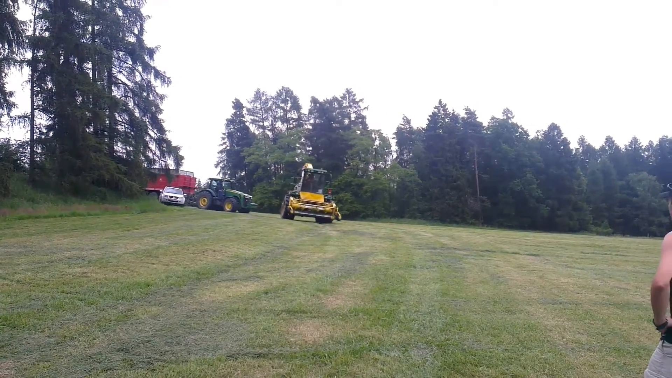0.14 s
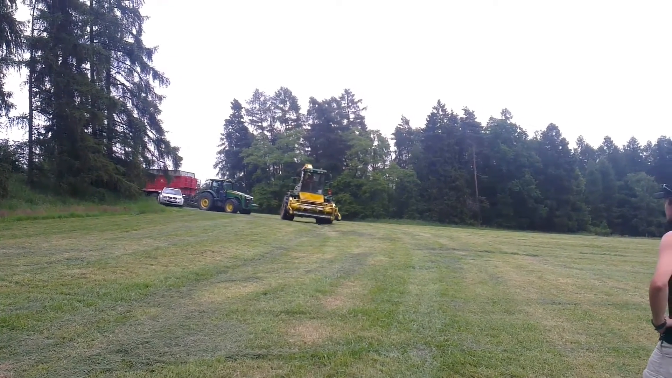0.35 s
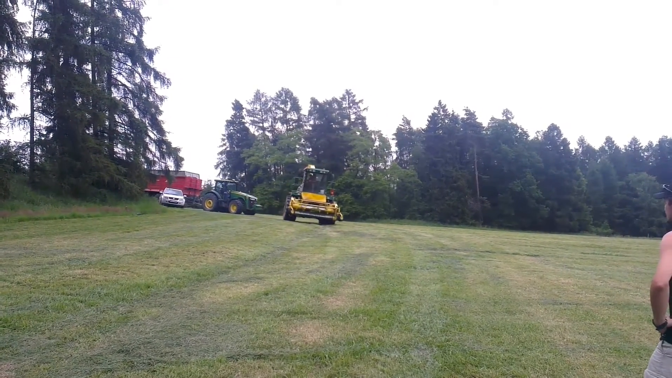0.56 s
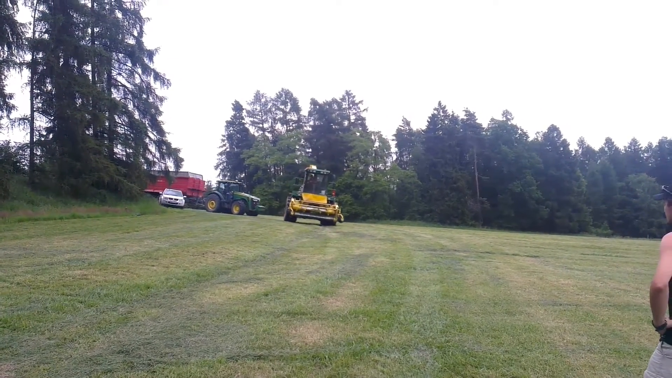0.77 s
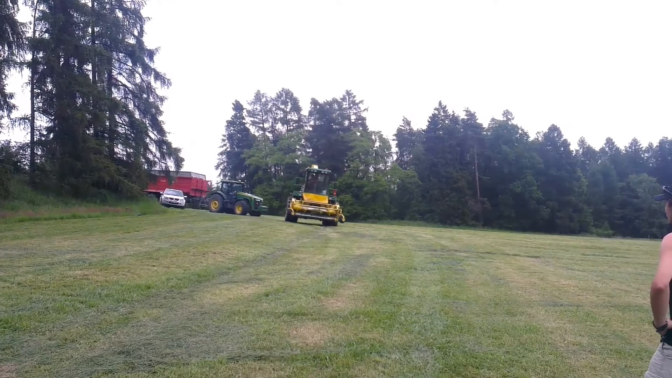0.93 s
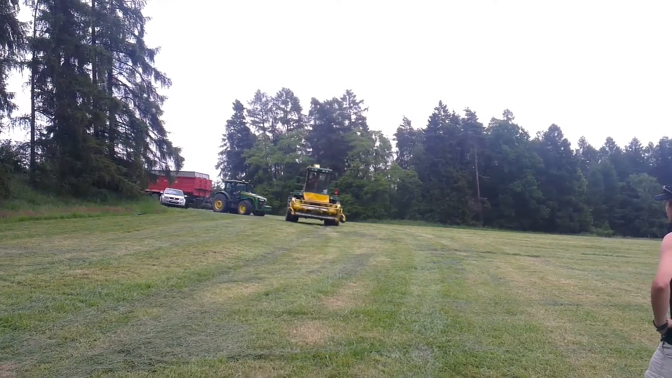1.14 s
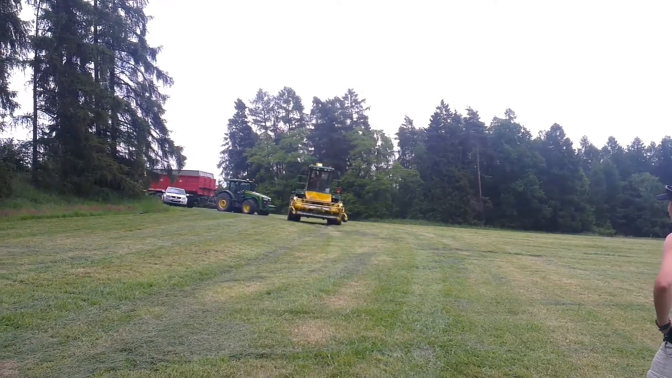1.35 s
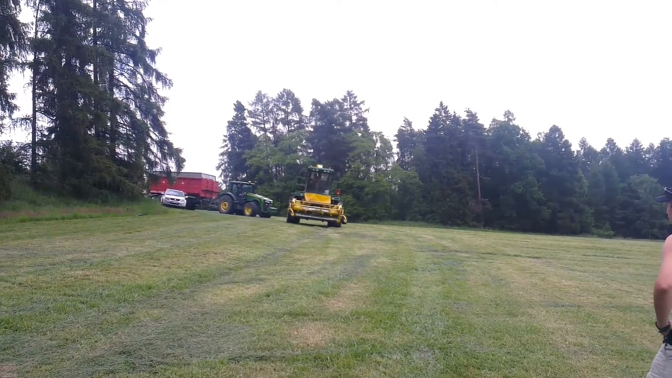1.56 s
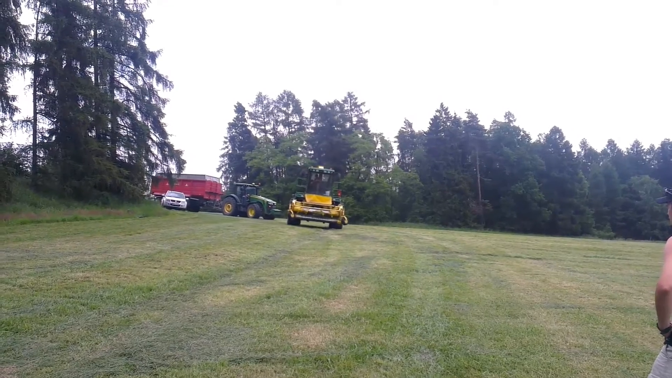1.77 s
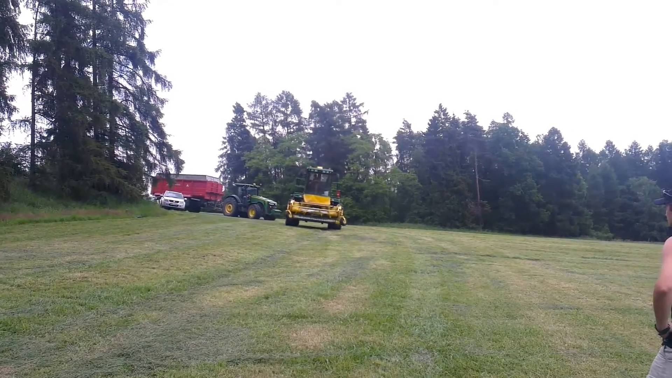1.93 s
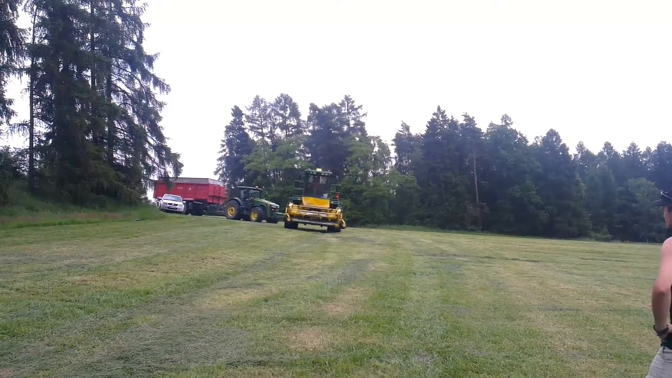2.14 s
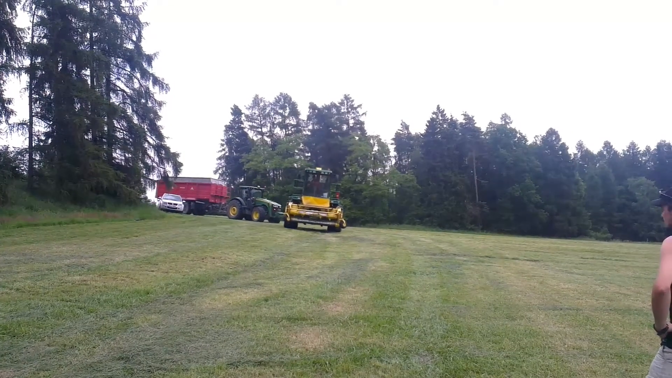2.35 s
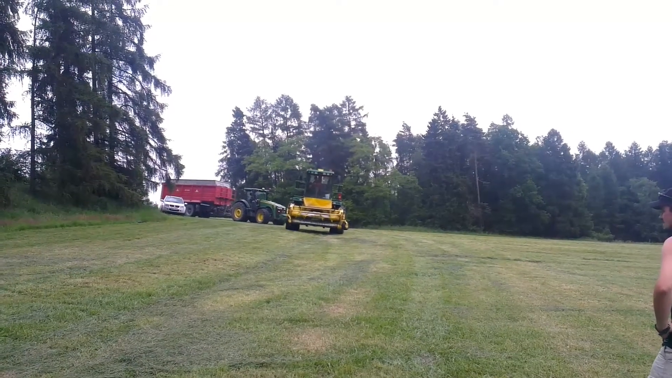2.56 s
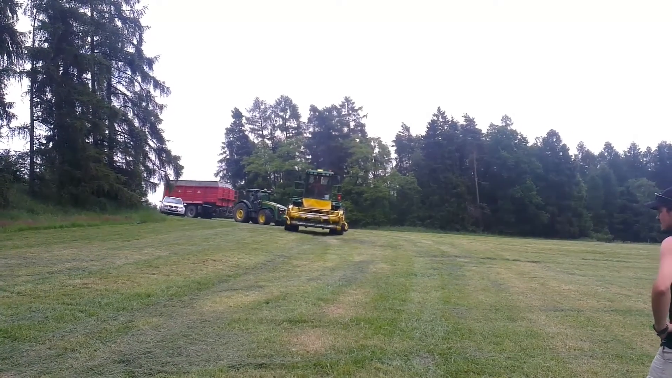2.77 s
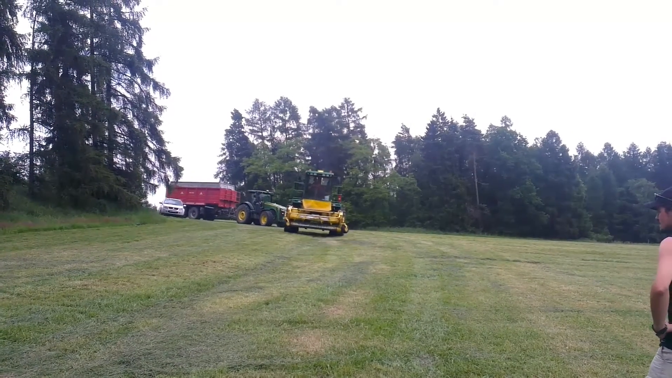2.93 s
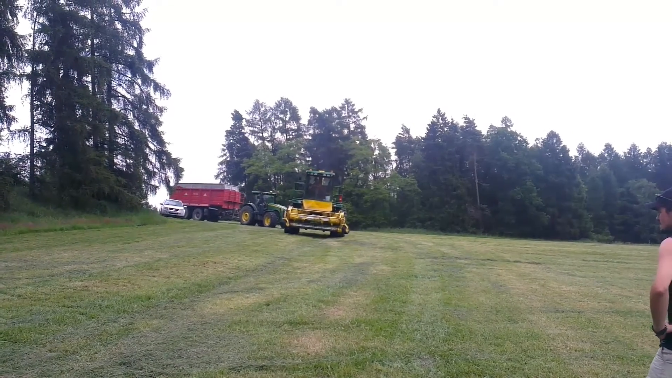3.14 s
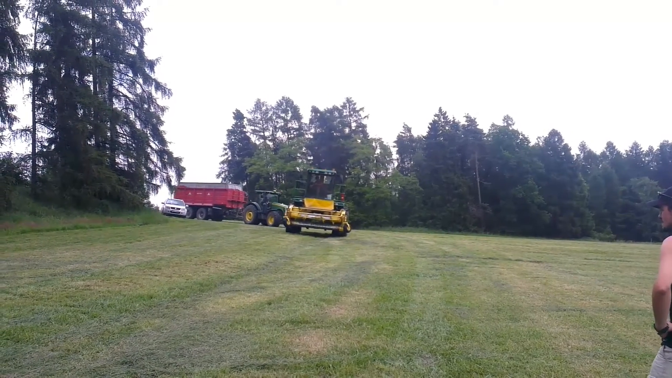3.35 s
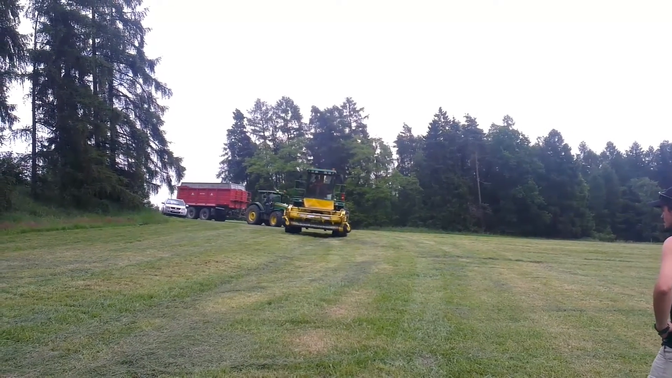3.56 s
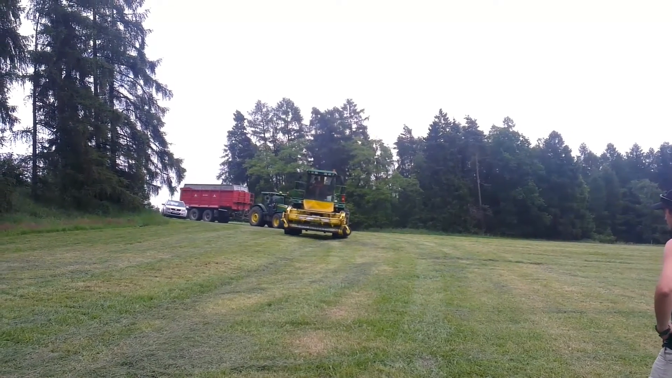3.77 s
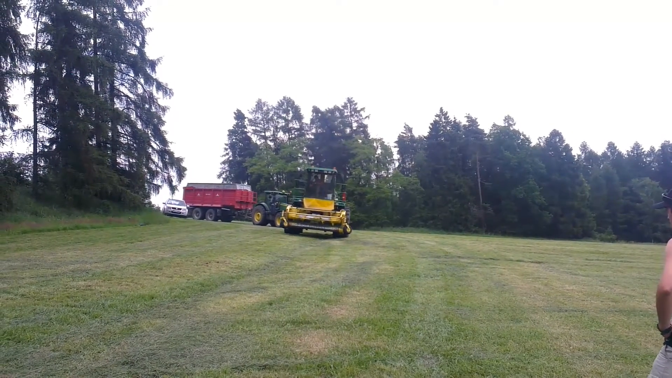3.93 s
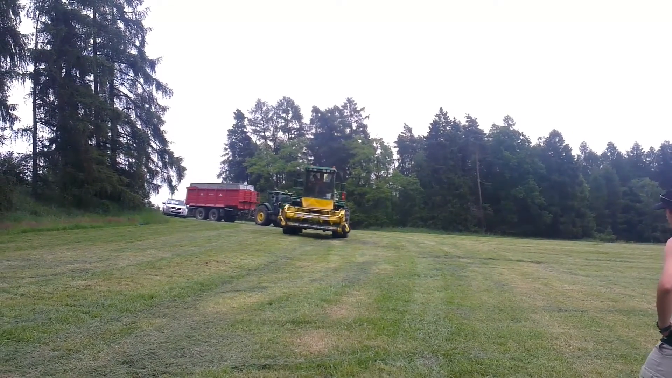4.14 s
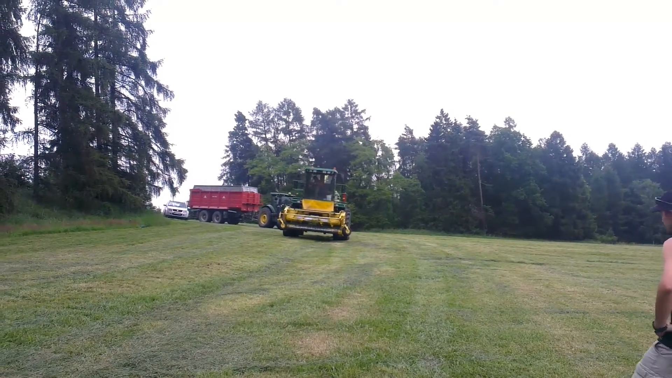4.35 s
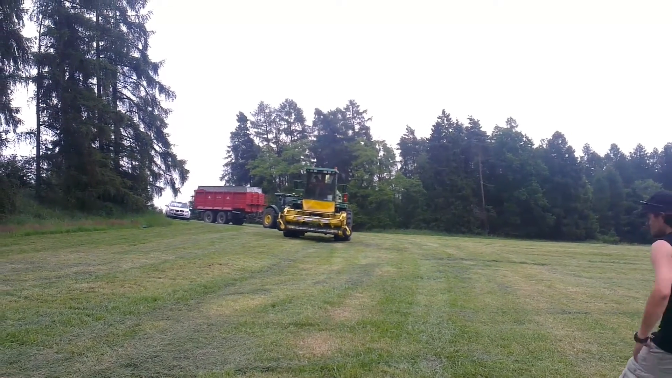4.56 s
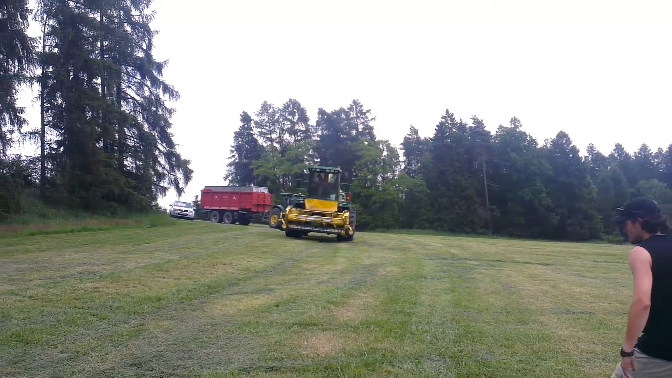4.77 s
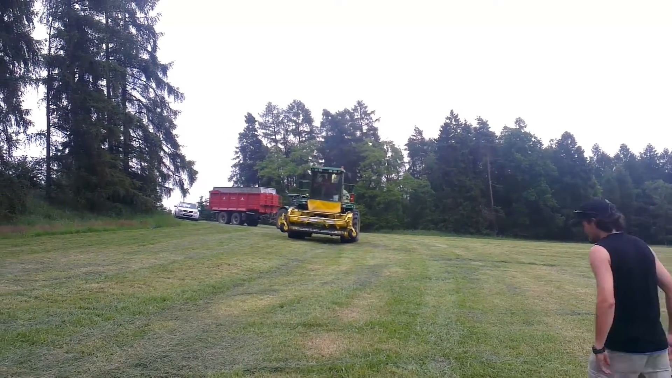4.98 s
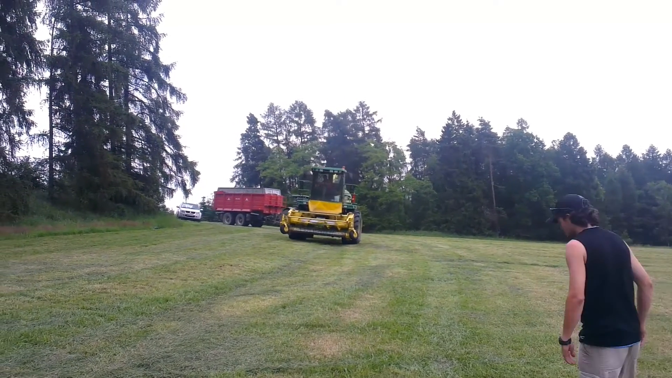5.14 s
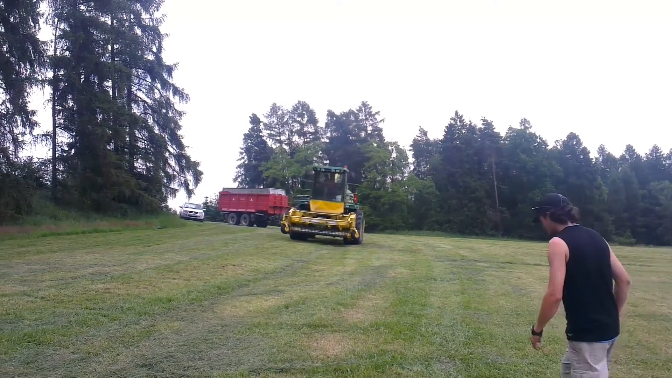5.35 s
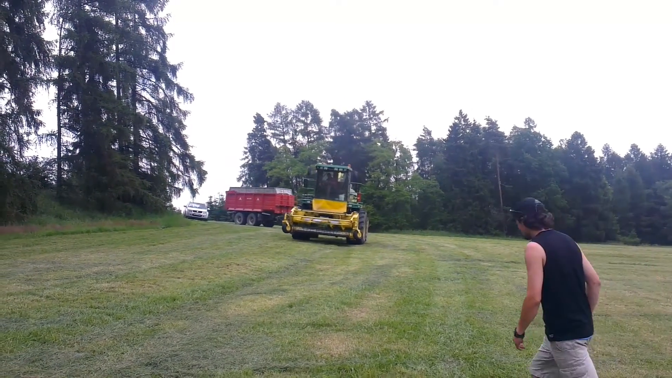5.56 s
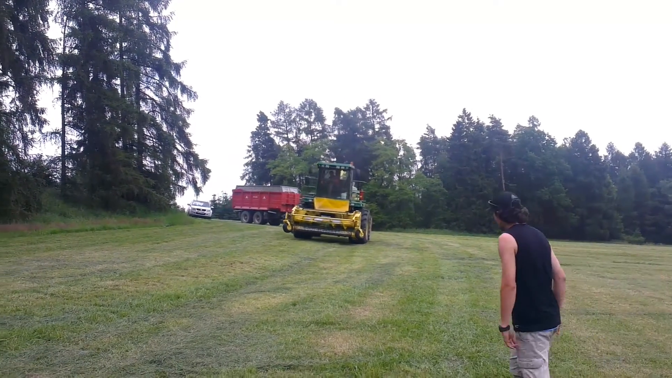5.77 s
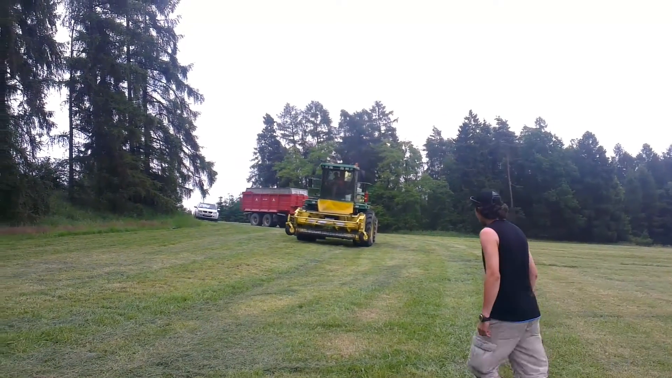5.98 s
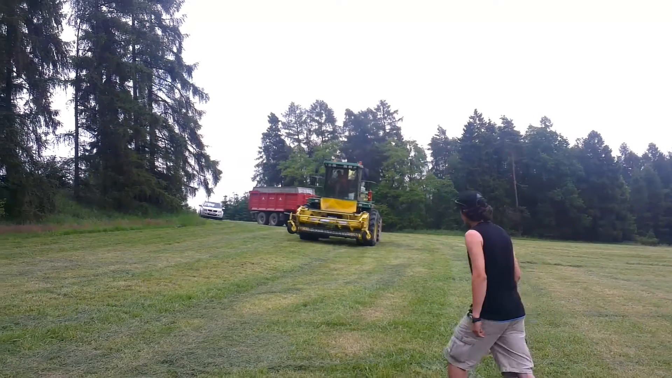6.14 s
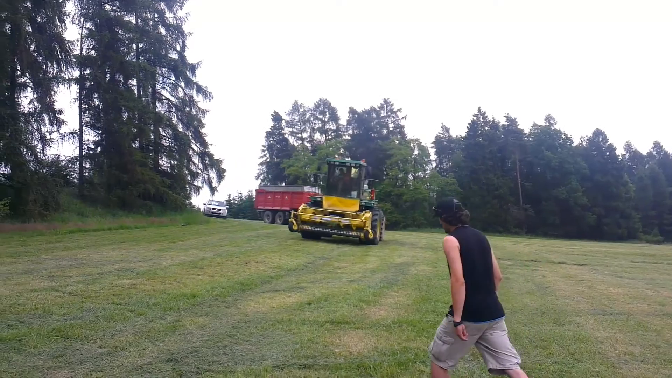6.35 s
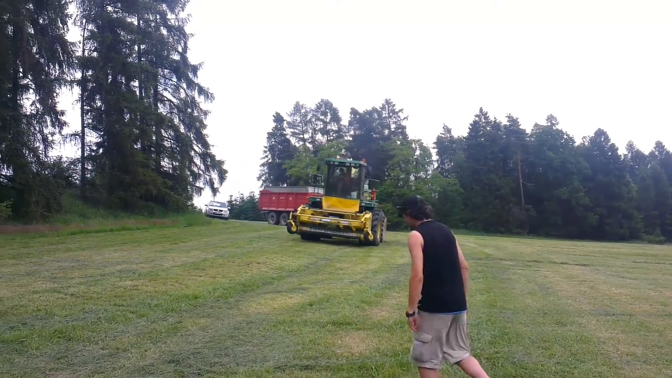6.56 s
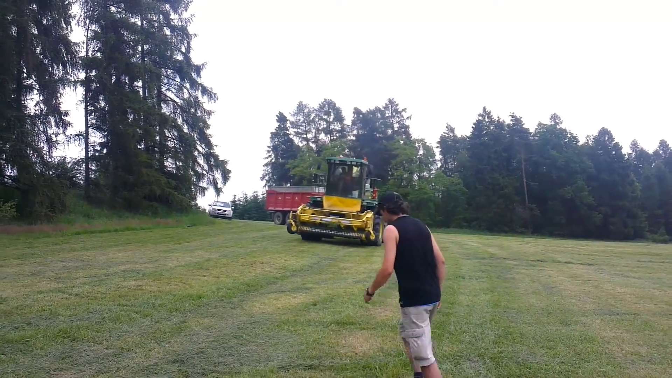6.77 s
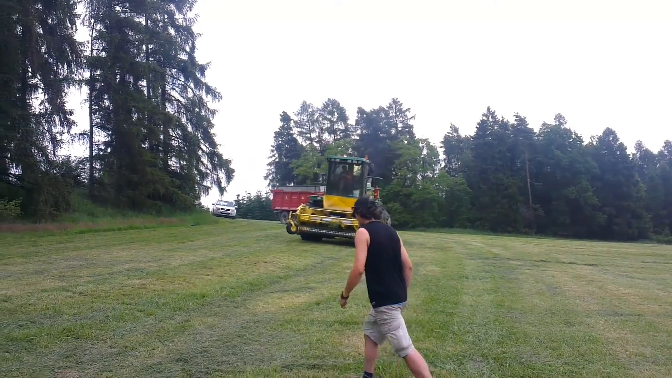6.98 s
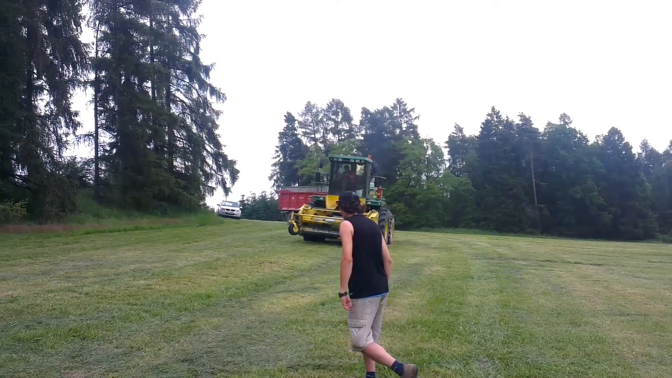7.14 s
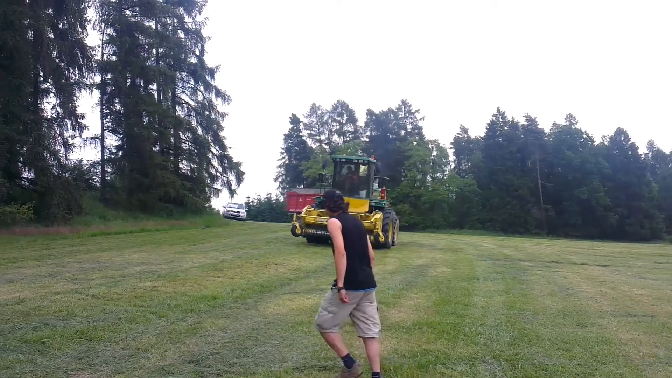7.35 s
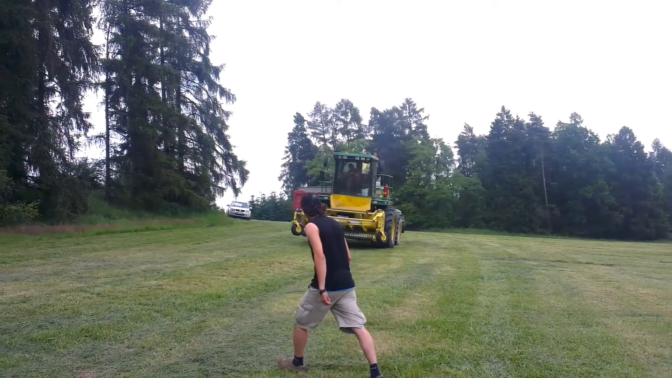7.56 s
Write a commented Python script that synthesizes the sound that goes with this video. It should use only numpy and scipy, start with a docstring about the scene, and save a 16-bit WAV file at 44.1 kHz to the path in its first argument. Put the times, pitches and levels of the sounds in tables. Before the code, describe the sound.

A self-propelled harvester approaches over an open mown field. Its chopping drum gives a dense, near-constant whine of many stacked tones, with pulsing air rush, hiss and a broad engine roar beneath. It stays moderate at first, grows clearly louder in the middle, then remains strong. Near the end the treble dips briefly as a man passes in front. Stereo outdoor microphone, little bass.

```python
"""Forage harvester approaching

A self-propelled forage harvester drives closer across a mown field edged with trees.
The chopping drum whines at harmonics of some 109 knife passes a second, over filtered noise pulsing with them.
Sines for diesel, fan and drives and a broad exhaust roar follow the drum's speed; a faint rumble lies below.
Near the end a man walks in front and briefly screens the treble."""
import sys
import numpy as np
from scipy import signal
from scipy.fft import rfft, irfft, next_fast_len
from scipy.io import wavfile
from scipy.ndimage import uniform_filter1d, map_coordinates

SR = 44100
rng = np.random.default_rng(int(sys.argv[2]) if len(sys.argv) > 2 else 0)


def generate_wav(signal):
    """Clip the signal to [-1, 1] and save it as 16-bit WAV at the path in sys.argv[1]."""
    frames = np.transpose(np.atleast_2d(signal))
    scaled = np.clip(frames, -1, 1) * 32767
    pcm = np.round(scaled).astype(np.int16)
    wavfile.write(sys.argv[1], SR, pcm)


N = 335601

# the approach: time_s, nearness (0 far, 1 near)
APPROACH = [(0, 0), (3.4, 0), (4.1, 0.34), (4.8, 0.7), (5.7, 1), (7.61, 1.09)]
# the governor hunts as the crop comes in unevenly: time_s, knife_rate_hz
SPEED = [(0, 108.66), (0.2, 108.62), (0.38, 108.45), (0.6, 108.68), (0.98, 108.38), (1.35, 108.73),
         (1.7, 108.5), (2.05, 108.57), (2.3, 108.35), (2.72, 108.64), (3, 108.38), (3.55, 108.8),
         (3.85, 108.29), (4.15, 108.71), (4.45, 108.57), (4.98, 108.86), (5.2, 108.54), (5.5, 108.67),
         (5.9, 108.66), (6.3, 108.82), (6.65, 108.61), (7.61, 108.7)]
KNIVES = 6  # knife passes in each turn of the drum
KNIFE_HZ = 108.6  # nominal knife passes a second

# drum harmonics, base levels: multiple_of_knife_rate, far_db, near_db, left_over_right_db, left_lead_rad
DRUM_TONES = [(5, -46.2, -32.8, 3, 0.2), (6, -46.9, -28.1, 2, 0.1), (7, -35.0, -28.6, 0, 0.0),
              (8, -44.2, -39.7, -3, 0.9), (9, -33.2, -28.3, 7, 0.8), (10, -31.7, -18.1, 6, 0.3),
              (11, -30.9, -21.3, 4, 0.1), (12, -49.1, -39.9, 1, 0.3), (13, -40.5, -29.5, 5, 0.9),
              (14, -43.8, -32.6, 13, 0.6), (15, -31.5, -35.8, 9, -0.2), (16, -43.2, -58.7, 1, -0.0),
              (17, -37.7, -33.1, 6, 0.8), (18, -39.7, -32.4, 13, 0.8), (19, -44.1, -44.2, 11, -2.3),
              (20, -39.1, -50.9, 3, -0.9), (21, -36.6, -32.4, 3, -0.0), (22, -39.0, -40.8, 4, 0.3),
              (23, -49.9, -38.3, 10, 0.7), (24, -46.4, -37.6, 7, -1.7), (25, -43.9, -44.2, 5, -1.1),
              (26, -46.7, -39.6, -2, 0.1), (27, -39.0, -41.5, 0, -1.0), (28, -38.9, -41.0, 1, -0.8),
              (29, -59.1, -35.6, 2, 1.1), (30, -39.7, -40.2, -4, -0.0), (31, -46.5, -41.0, -6, -0.9),
              (32, -48.3, -49.1, -13, -1.9), (33, -41.7, -51.8, -12, 2.5), (34, -48.1, -49.2, -2, 0.1),
              (35, -43.4, -47.2, -5, -0.6), (36, -52.9, -52.3, -12, 2.4), (37, -47.4, -55.8, -4, 1.8)]
# lobes and nulls of single harmonics sweep past as the machine turns:
# multiple_of_knife_rate, centre_s, half_width_s, gain_db
LOBES = [(5, 3, 1.5, 6), (6, 0.6, 1, 12), (6, 5.3, 0.9, -6), (7, 7.5, 0.45, 3.5), (8, 3.5, 1.3, 4),
         (9, 7, 0.57, 2.5), (10, 3.5, 0.61, -17.5), (10, 1.6, 0.24, 5), (10, 6.6, 0.19, -1.6),
         (11, 7.5, 1.27, -18.5), (11, 3.5, 1.3, -5.5), (12, 4.1, 0.6, 6.5), (13, 5.0, 0.98, 3.5),
         (13, 1.0, 0.65, 3.5), (14, 1.3, 0.55, -15), (14, 7.5, 0.59, -7.5), (15, 4, 0.55, -12),
         (15, 1.6, 0.3, 4.5), (16, 6, 1.26, 23.5), (17, 0.0, 0.4, -11), (17, 5.5, 0.23, -6),
         (18, 0.5, 1.3, -13), (19, 3, 1.3, -10.2), (20, 5, 1, 14.5), (21, 0.5, 0.65, -6),
         (22, 3.5, 1.4, -5.5), (22, 2, 0.3, -10), (23, 0.46, 0.55, 15), (24, 1.1, 1.3, 9.5),
         (27, 3, 0.77, -9), (27, 3.5, 0.82, 4.5), (28, 6.5, 1.6, 7.5), (28, 1.8, 0.9, 4),
         (29, 2.5, 1.1, 18), (30, 7, 0.53, 12.5), (30, 1, 0.36, -10), (31, 0.0, 0.27, 15),
         (32, 2.1, 1.2, 10), (33, 0, 0.98, -18), (34, 1.1, 1.4, -14), (35, 2.9, 1.3, -17),
         (36, 4, 0.45, 13), (37, 0, 0.71, -14.5), (37, 6.5, 1.3, 17.5)]
# echoes in the housing smear each knife's pulse: frequency_hz, phase_spread_cycles
SMEAR = [(550, .2), (870, .16), (970, .03), (1300, .035), (1500, .1), (2400, .12), (2800, .05), (3900, .08)]
SWEEP = .012  # each pulse is a short rising chirp: harmonic lag in cycles, per squared multiple
# unequal knives put tones between the harmonics, base levels: multiple_of_turning_rate, far_db, near_db
SIDE_TONES = [(34, -47, -41), (41, -53, -42), (44, -52, -43), (56, -52, -42), (59, -53, -38),
              (73, -59, -44), (77, -53, -45), (79, -52, -45), (89, -47, -47), (91, -49, -47),
              (119, -52, -52), (125, -52, -46), (127, -48, -47), (167, -49, -46), (169, -50, -47),
              (179, -54, -46), (181, -52, -45)]

# noise colours, overall level set elsewhere: frequency_hz, relative_level_db (per Hz)
AIR_FAR_COLOUR = [(400, -52), (850, -8), (1100, 6), (1350, -0.5), (1700, -0.5), (2050, 1), (2400, 0.5),
                  (3100, 2.5), (3700, -2.5), (4300, -30), (7000, -36)]
AIR_NEAR_COLOUR = [(400, -53.5), (850, -5.5), (1100, 9.5), (1350, 0), (1700, 2), (2050, 1), (2400, 2.5),
                   (3200, -2), (3700, -4), (4300, -15), (7000, -63)]
HISS_COLOUR = [(1500, -37), (3900, 6.5), (4300, 1.5), (4600, 6), (5500, 0.5), (7000, -1.5), (7800, -7.5),
               (8300, -6), (8800, -14), (9600, -5), (10100, -11.5), (10800, -41)]
ROAR_COLOUR = [(25, -68), (45, -63.5), (72, -46), (100, -49), (150, -46), (200, -21.5), (280, -18),
               (370, -22), (480, -14.5), (560, -4.5), (700, 0.5), (880, -6), (1200, -6.5), (2500, -65)]
RUMBLE_COLOUR = [(30, -30), (70, -18.5), (95, -30), (145, 0), (180, 3.5), (260, -23), (500, -71.5)]
# hollows in the rush, which shift as the machine nears: centre_hz, width_hz, far_depth_db, near_depth_db
HOLLOWS = [(1343, 34, 3.5, 0.5), (1800, 23, 4, 4), (2070, 50, 9, 8.5), (2675, 26, 3, 4), (2750, 28, 6, 8.5),
           (2880, 26, 4, 0), (3140, 47, 11, -0.5), (3590, 55, 7.5, 8), (3770, 32, 5.5, 7),
           (4284, 104, 15, 13), (4730, 66, 24, 20), (5160, 97, 6, 10.5), (5910, 58, 13, 8),
           (6360, 86, 15, 6.5)]
# passing nulls in rush and roar, as the machine turns: centre_hz, width_hz, centre_s, half_width_s, depth_db
NULLS = [(375, 30, 1.4, 0.49, 6), (1306, 60, 2, 0.88, 6), (1810, 35, -2, .5, 7), (1710, 50, 4.5, 0.32, 9),
         (1750, 55, 7.5, .55, 8), (2160, 50, 8, .8, 11), (2080, 45, 3.5, .9, 5), (2420, 45, 4.5, 0.76, 6),
         (3160, 55, -1, .6, 5), (3230, 45, 0, .5, 8), (3250, 55, 3, .45, 3), (3690, 60, -0.5, 0.95, 4),
         (3530, 40, 6.9, 1, 4), (4140, 88, .8, .7, 10), (4140, 70, 3.5, .6, 8), (4300, 70, 5, .55, 9)]
# diesel, fan and drive tones at nominal speed, base levels: pitch_hz, far_db, near_db
DRIVE_TONES = [(202.3, -63, -60), (226.5, -47.7, -44), (290.9, -58, -54), (436.9, -52.5, -47),
               (582, -44.5, -41), (679.7, -45, -34), (727.8, -39, -31), (795.5, -50, -43),
               (906.4, -55, -45), (1163.6, -43, -45), (1454.5, -50, -46)]
# brief lifts and dips of the level: centre_s, half_width_s, gain_db
SURGES = [(.33, 0.046, -1.5), (1.27, .07, 1.2), (2.59, .05, 1.7), (2.98, 0.037, -1.3), (3.39, 0.035, -0.5),
          (5.87, 0.095, 1), (6.38, 0.039, -2), (7.15, 0.065, 1)]
# likeness of left and right noise, before ripple and limits: frequency_hz, likeness (1 mono, 0 unrelated)
LIKENESS = [(70, 1.3), (200, .93), (700, 0.9), (1300, 0.5), (2400, 0.5), (3500, 0.3), (5500, 0.2),
            (8000, 0.5), (10000, 0)]
# left-right balance of the noise: frequency_hz, left_over_right_db
BALANCE = [(200, -3), (700, 2.5), (1100, 5), (2000, 4.5), (2800, 3.5), (3500, -4.5), (4800, -4), (6000, 1),
           (8000, -4), (10000, 14)]

# base levels far off, and the gain at nearness 1
AIR_DB, AIR_NEAR_DB = -28.5, 3
HISS_DB, HISS_NEAR_DB = -39.5, 3.5
ROAR_DB, ROAR_NEAR_DB = -33, 6
RUMBLE_DB, RUMBLE_NEAR_DB = -64.5, 2
ROAR_SWELL_S, ROAR_DB_PER_S = 6.45, 3.5  # the roar gains an extra swell from this time on
OPEN_S, OPEN_DB = 0.68, 2.5  # whine and roar start this much softer and open up over this time
SHADOW_S, SHADOW_HALF_S, SHADOW_DB = 7.05, 0.46, 4.5  # a man walks past and screens the treble
SHADOW_HZ = 3460  # drum tones lose less the further they lie below this
FLARE_S, FLARE_HALF_S, FLARE_DB = 6.65, 0.18, 3  # rush and hiss lift just before the screening
RATTLE_SHARE = .17  # share of the rush's excitation power that repeats every turn
TICK_GAIN, TICK_SHARPNESS = .45, 25  # knife passing the shear bar: relative height and narrowness
HOUSING_LOW_HZ = 520  # the housing radiates little below this
CROSS_DELAY_S = .001282  # the stereo likeness ripples like a mix with a copy this late
CEILING, TOP_HZ = .98, 10788  # soft limit of the peaks, and upper band limit


def amp(db):
    """Gain from decibels."""
    return 10 ** (np.asarray(db) / 20)


def unit(x):
    """Scale to an rms of 1."""
    return x / np.sqrt(np.mean(x ** 2) + 1e-20)


def along(points, hz):
    """Read a curve of frequency and value on a log frequency axis."""
    f, v = np.transpose(points)
    return np.interp(np.log(hz + 1), np.log(f + 1), v)


def time_curve(points):
    """Draw straight lines between time and value points, one value per sample."""
    s, values = np.transpose(points)
    return np.interp(np.arange(N) / SR, s, values)


def bump(centre_s, half_width_s):
    """A bell in time with a peak of 1."""
    return np.exp(-((np.arange(N) / SR - centre_s) / half_width_s) ** 2)


def wobble(rate):
    """A smooth random curve with this many knots a second."""
    coarse = np.linspace(0, N, 2000)
    knots = rng.standard_normal(1000)
    smooth = map_coordinates(knots, [coarse * rate / SR], mode="mirror")
    return np.interp(np.arange(N), coarse, smooth)


def filtered(x, response):
    """Shape the spectrum of x by a function of frequency."""
    m = next_fast_len(N + SR // 2)
    return irfft(rfft(x, m) * response(np.fft.rfftfreq(m, 1 / SR)), m)[..., :N]


def pan(db):
    """Left and right gains of constant power."""
    pair = amp(np.array([db, -db]) / 2).reshape(2, -1)
    return pair / np.sqrt(np.mean(pair ** 2, axis=0))


def tone(cycles, lead=0):
    """A stereo sine of rms 1 whose left side leads by an angle in radians."""
    angle = 2 * np.pi * (cycles % 1) + np.array([[lead], [-lead]]) / 2
    return np.sqrt(2) * np.sin(angle.astype(np.float32))


def noise(colour, white, lead_s=.00004):
    """Coloured stereo noise of rms 1, near mono in the bass and wide in the treble; it reaches the left first."""
    def mid_side(hz):
        likeness = along(LIKENESS, hz)
        ripple = 0.19 * (1 - likeness) * np.cos(2 * np.pi * hz * CROSS_DELAY_S)
        turn = np.arccos(np.clip(likeness + ripple, -1, 1)) / 2
        return amp(along(colour, hz)) * [np.cos(turn), np.sin(turn)]

    def placement(hz):
        lead = hz * lead_s / (1 + (hz / 2500) ** 2)  # the lead fades in the treble
        return pan(along(BALANCE, hz)) * np.exp(1j * np.pi * np.outer([1, -1], lead))

    mid, side = filtered(white, mid_side)
    return unit(filtered(np.array([mid + side, mid - side]), placement))


def opening():
    """The slight rise at the start, in dB."""
    return OPEN_DB * np.minimum(np.arange(N) / SR / OPEN_S - 1, 0)


def whine(passes, near, fade_db, drum_db, scatter):
    """Harmonics of the knife rate form one pulse a knife; moving air makes each waver, the high ones most."""
    out = np.zeros((2, N))
    common_db = drum_db + opening() + 0.52 * wobble(14)
    shadow_db = SHADOW_DB * bump(SHADOW_S, SHADOW_HALF_S)
    for order, far_db, near_db, side_db, lead in DRUM_TONES:
        level_db = far_db + (near_db - far_db) * near + common_db
        level_db = level_db - shadow_db * min(order * KNIFE_HZ / SHADOW_HZ, 1) ** 2
        level_db = level_db + sum(db * bump(s, half) for k, s, half, db in LOBES if round(k) == order)
        level_db = level_db + fade_db * np.sqrt(order / 20) * wobble(13)
        smear = along(SMEAR, order * KNIFE_HZ) * rng.standard_normal()
        wander = scatter * np.sqrt(order) * wobble(9.1)
        cycles = order * passes - SWEEP * order ** 2 + smear + wander
        out += amp(level_db) * pan(side_db) * tone(cycles, lead)
    return out


def side_tones(passes, near, fade_db):
    """Unequal knives sound multiples of the drum's turning rate, so the whine throbs evenly."""
    out = np.zeros((2, N))
    for order, far_db, near_db in SIDE_TONES:
        level_db = far_db + (near_db - far_db) * near + opening() + fade_db * wobble(3.19)
        out += amp(level_db) * pan(3.6) * tone(order * passes / KNIVES + rng.random(), 0.33)
    return out


def air(passes, near, puff_db, flutter_db):
    """Each knife throws a puff of air and ticks; the rush changes colour as the machine nears."""
    screen_db = FLARE_DB * bump(FLARE_S, FLARE_HALF_S) - SHADOW_DB * bump(SHADOW_S, SHADOW_HALF_S)
    air_db = AIR_DB + AIR_NEAR_DB * near + screen_db + flutter_db * wobble(14)
    hiss_db = HISS_DB + HISS_NEAR_DB * near + screen_db + 0.52 * wobble(16)
    stroke = np.cos(2 * np.pi * passes)
    puffs = unit(amp(puff_db * stroke))
    ticks = unit(1 + TICK_GAIN * np.exp(TICK_SHARPNESS * (stroke - 1)))
    share = np.clip(near, 0, 1)
    far_rush = flicker(noise(AIR_FAR_COLOUR, clatter(passes, RATTLE_SHARE)), depth_db=0.95, full_hz=1200)
    near_rush = flicker(noise(AIR_NEAR_COLOUR, clatter(passes, RATTLE_SHARE)), depth_db=0.9, full_hz=1200)
    rush = np.sqrt(1 - share) * amp(1.5) * far_rush + np.sqrt(share) * amp(3.0) * near_rush
    hiss = amp(2.5) * flicker(noise(HISS_COLOUR, clatter(passes, RATTLE_SHARE)), depth_db=4.5, full_hz=8000)
    hiss += amp(-1) * buzz(passes, fade_db=2.5, blur=0.19)
    return housing(ticks * (amp(air_db) * rush * puffs + amp(hiss_db) * hiss), share)


def buzz(passes, fade_db, blur):
    """The drum's highest harmonics, blurred in phase, sink into the hiss."""
    out = np.zeros((2, N))
    for order in range(38, 66):
        level_db = fade_db * wobble(7) - 0.29 * order
        cycles = order * passes + rng.random() + blur * wobble(25)
        out += amp(level_db) * tone(cycles, rng.normal(0, 1.57))
    return unit(out)


def clatter(passes, repeat):
    """White excitation of which a share repeats with every turn of the drum: each knife has its own rattle."""
    size = 16384  # points in one turn
    order = np.arange(size // 2 + 1)
    # what all knives have in common sounds in the whine instead
    heard = (order % KNIVES > 0) & (order * KNIFE_HZ / KNIVES < SR / 2)
    rattles = unit(irfft(heard * np.exp(2j * np.pi * rng.random((2, len(order))))))
    position = passes / KNIVES % 1 * size
    turn = np.array([np.interp(position, np.arange(size), row) for row in rattles])
    return np.sqrt(repeat) * turn + np.sqrt(1 - repeat) * rng.standard_normal((2, N))


def flicker(x, depth_db, full_hz):
    """Narrow bands flicker independently, with the whole depth from full_hz upward."""
    hz, _, z = signal.stft(x, SR, nperseg=512)
    field = uniform_filter1d(rng.standard_normal(z.shape[1:]), size=4, axis=0)  # across frequency
    field = unit(uniform_filter1d(field, size=18, axis=1))  # across time
    reach = np.minimum(hz[:, None] / full_hz, 1) ** 2
    return unit(signal.istft(z * amp(depth_db * reach * field), SR, nperseg=512)[1][:, :N])


def housing(x, share):
    """Hollows colour the air that rushes out, differently far off and near; the bass stays inside."""
    def response(hz):
        depth_db = sum(np.outer([far_db, near_db], np.exp(-((hz - c) / w) ** 2))
                       for c, w, far_db, near_db in HOLLOWS)
        low_cut = hz ** 6 / (hz ** 6 + HOUSING_LOW_HZ ** 6)
        return amp(-depth_db)[:, None] * low_cut

    far, close = filtered(x, response)
    return (1 - share) * far + share * close


def engine(passes, near, fade_db, drift):
    """Diesel, fan and drives turn in step with the drum, over a broad exhaust roar."""
    swell_db = ROAR_DB_PER_S * np.maximum(np.arange(N) / SR - ROAR_SWELL_S, 0)
    roar_db = ROAR_DB + ROAR_NEAR_DB * near + swell_db + opening() - 1.0 + 2.0 * wobble(12)
    out = amp(roar_db) * noise(ROAR_COLOUR, clatter(passes, repeat=0.039))
    clock = passes / KNIFE_HZ  # seconds at nominal speed
    for hz, far_db, near_db in DRIVE_TONES:
        level_db = far_db + (near_db - far_db) * near - .5
        level_db = level_db + fade_db * np.sqrt(500 / hz) * wobble(11)
        cycles = hz * clock + rng.random() + drift * wobble(3.02)
        out += amp(level_db) * pan(0.57) * tone(cycles, lead=0.083)
    return out


def passing_nulls(x):
    """Narrow bands sink for a moment and come back as the machine turns."""
    hz, t, z = signal.stft(x, SR, nperseg=2048)
    cut_db = sum(db * np.outer(np.exp(-((hz - c) / w) ** 2), np.exp(-((t - s) / half) ** 2))
                 for c, w, s, half, db in NULLS)
    return signal.istft(z * amp(-cut_db), SR, nperseg=2048)[1][:, :N]


def waver(depth_db):
    """Gain of the whole machine: moving air makes it waver, with a few clearer lifts and dips."""
    surge_db = sum(db * bump(s, half) for s, half, db in SURGES)
    return amp(depth_db * wobble(15) + surge_db)


def rumble(near, lump_db):
    """Faint low noise comes and goes in lumps under a random gain."""
    lumps = amp(lump_db * np.tanh(wobble(9.8)))
    low = noise(RUMBLE_COLOUR, rng.standard_normal((2, N)))
    return amp(RUMBLE_DB + RUMBLE_NEAR_DB * near) * unit(lumps * low)


def scene():
    """One drum speed and one approach drive the whole machine."""
    near = time_curve(APPROACH)
    passes = np.cumsum(time_curve(SPEED)) / SR  # running count of knife passes
    drum = whine(passes, near, fade_db=1.43, drum_db=0.12, scatter=0.0097)
    drum = drum + side_tones(passes, near, fade_db=2.5)
    rush = air(passes, near, puff_db=1.5, flutter_db=0.68)
    motor = engine(passes, near, fade_db=0.8, drift=0.024)
    machine = drum + passing_nulls(rush + motor)
    return waver(depth_db=0.34) * machine + rumble(near, lump_db=8.0)


def record(dry):
    """Round off the highest peaks, fade both ends over 4 ms and cut everything above the band limit."""
    rounded = dry / (1 + (dry / CEILING) ** 20) ** (1 / 20)
    edge = np.minimum(np.arange(N), np.arange(N)[::-1]) / (.004 * SR)
    fade = np.sin(np.pi / 2 * np.minimum(edge, 1)) ** 2
    return filtered(rounded * fade, lambda hz: hz < TOP_HZ)


dry = scene()
out = record(dry)
generate_wav(out)
```